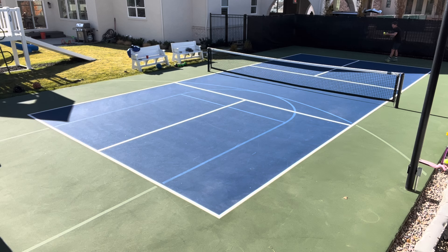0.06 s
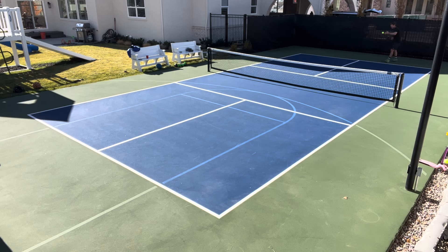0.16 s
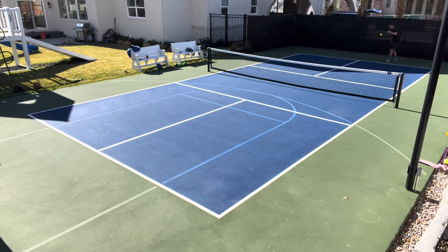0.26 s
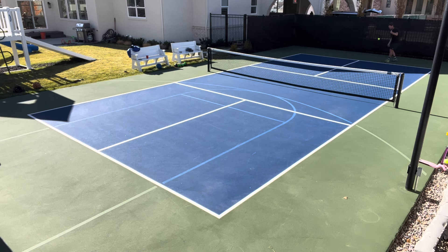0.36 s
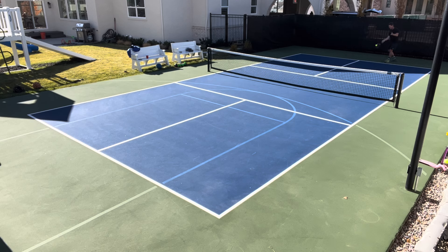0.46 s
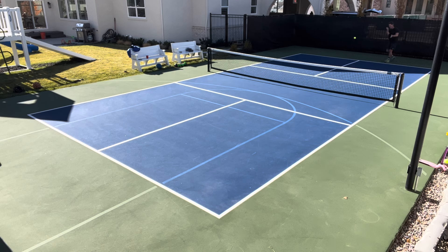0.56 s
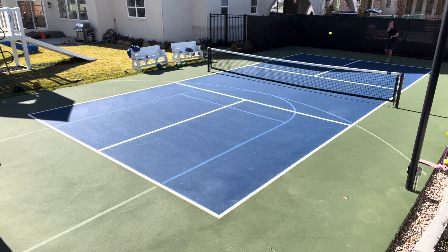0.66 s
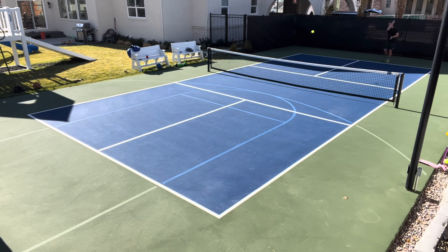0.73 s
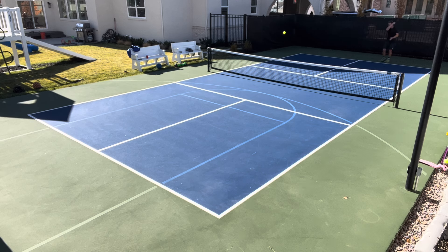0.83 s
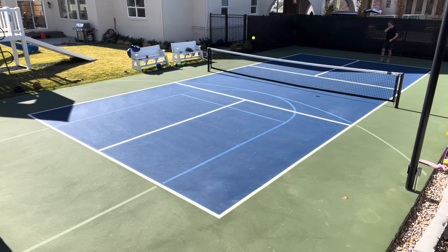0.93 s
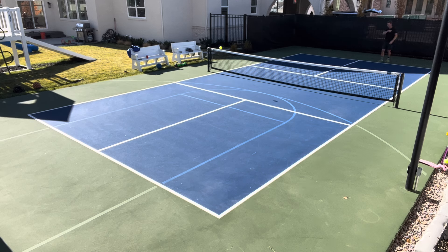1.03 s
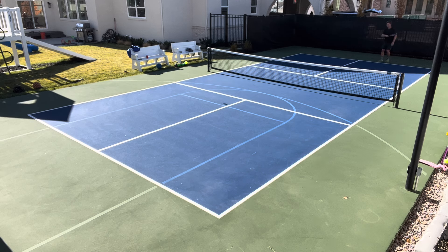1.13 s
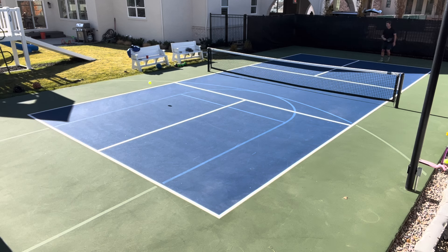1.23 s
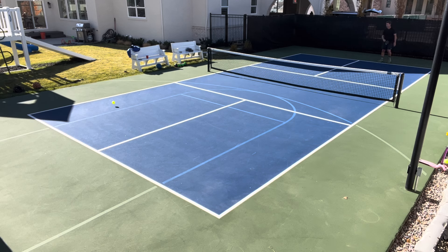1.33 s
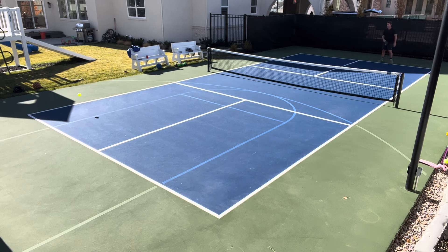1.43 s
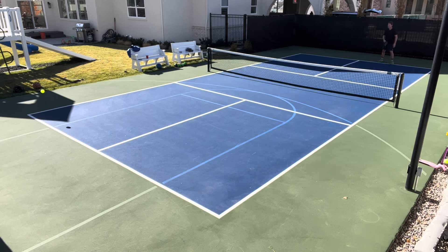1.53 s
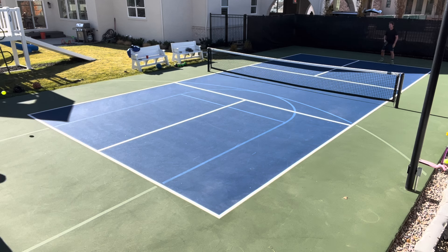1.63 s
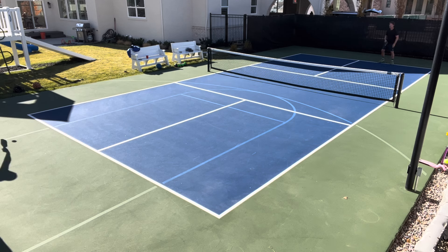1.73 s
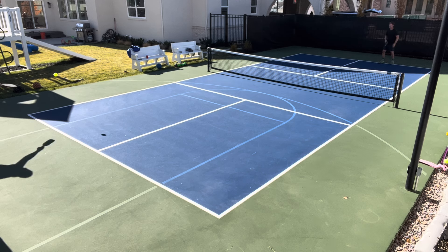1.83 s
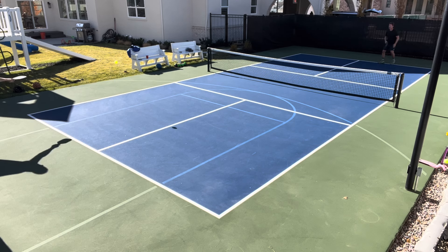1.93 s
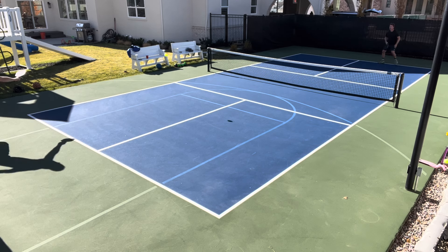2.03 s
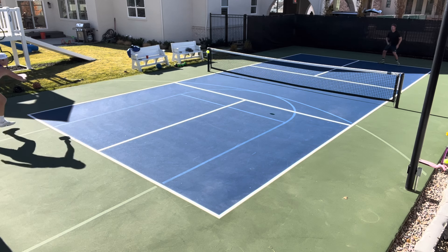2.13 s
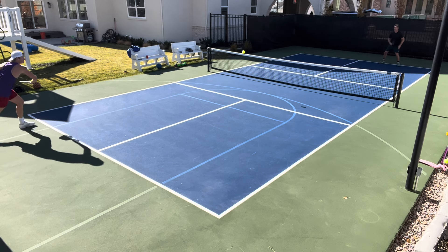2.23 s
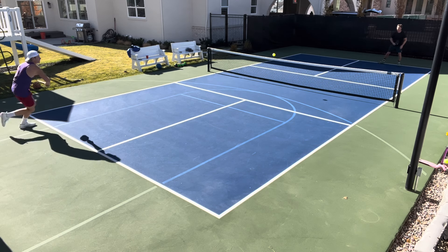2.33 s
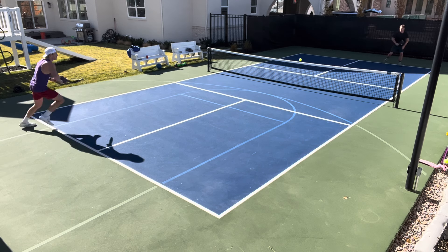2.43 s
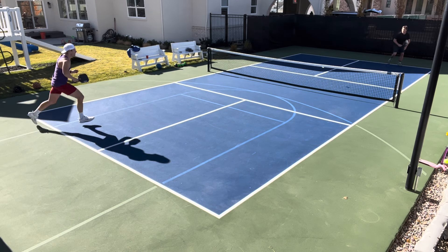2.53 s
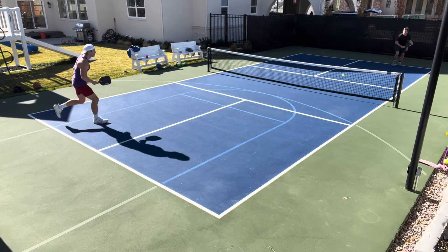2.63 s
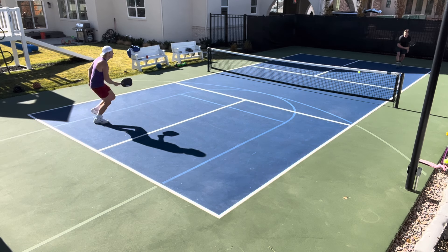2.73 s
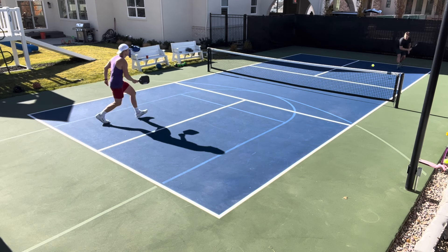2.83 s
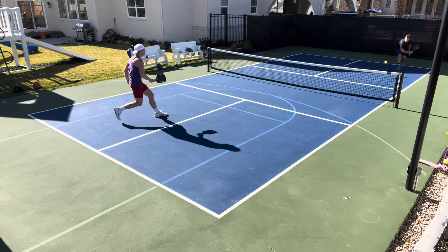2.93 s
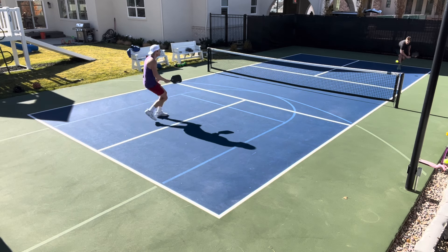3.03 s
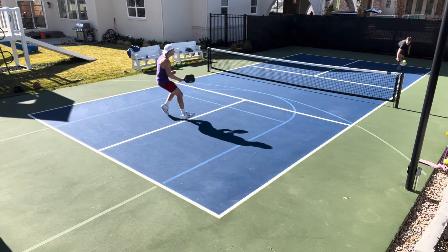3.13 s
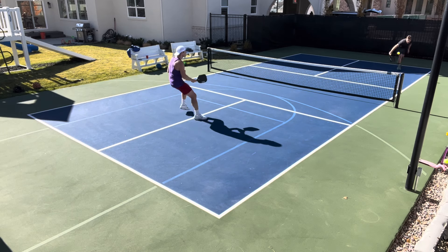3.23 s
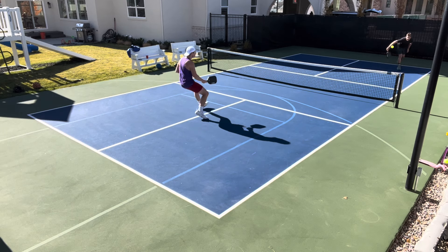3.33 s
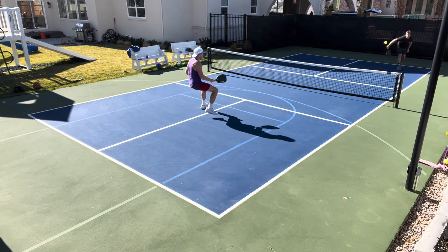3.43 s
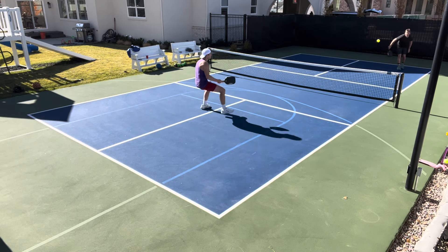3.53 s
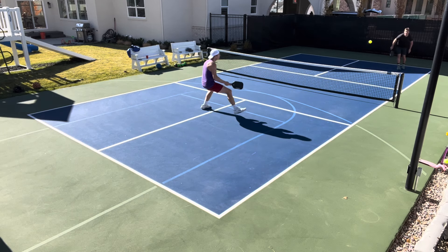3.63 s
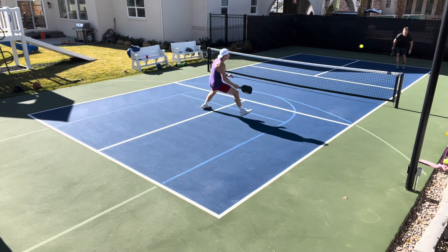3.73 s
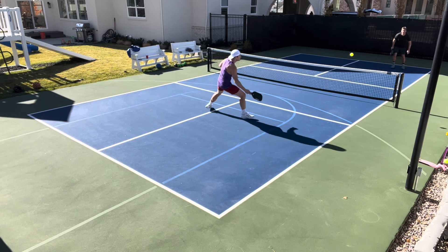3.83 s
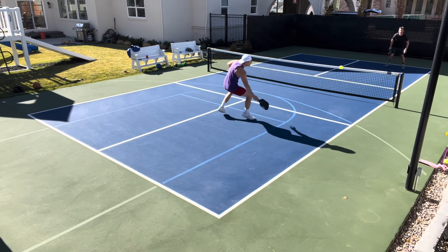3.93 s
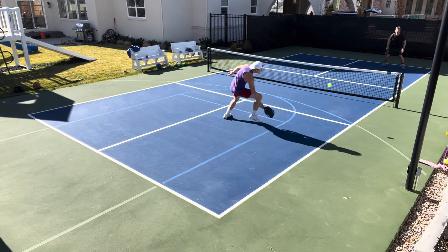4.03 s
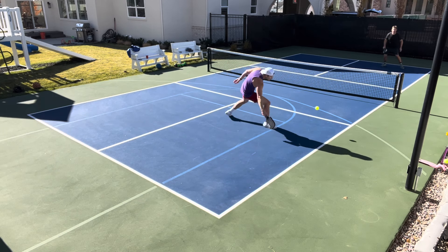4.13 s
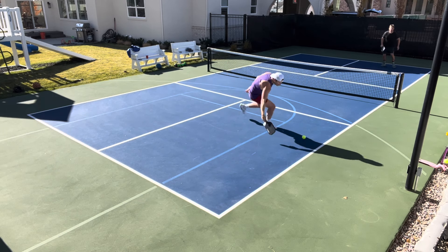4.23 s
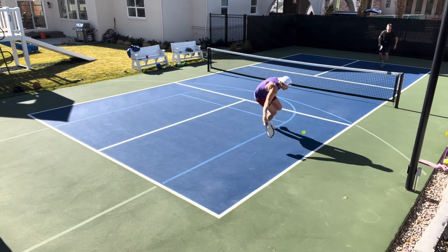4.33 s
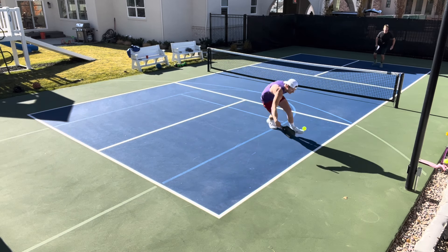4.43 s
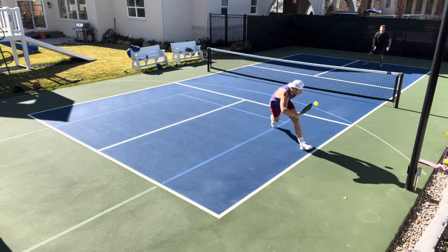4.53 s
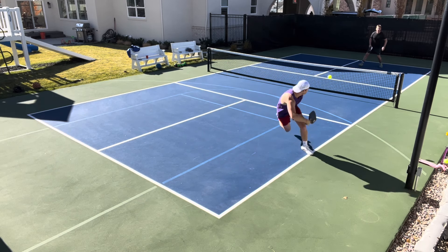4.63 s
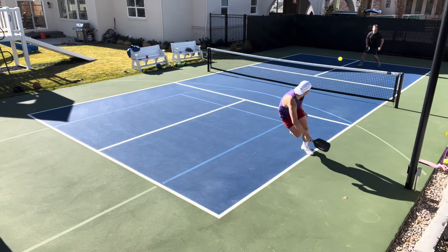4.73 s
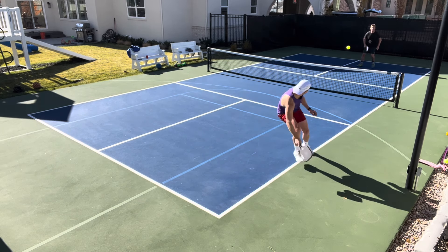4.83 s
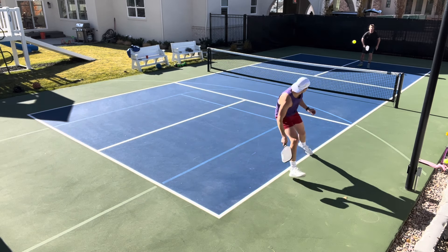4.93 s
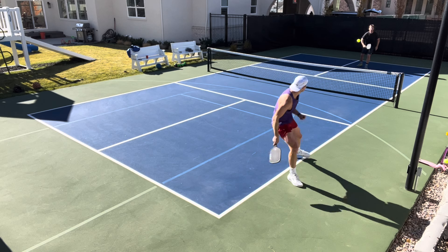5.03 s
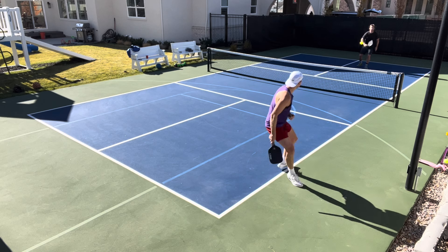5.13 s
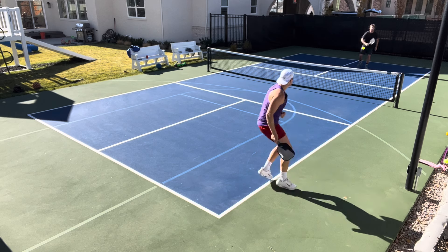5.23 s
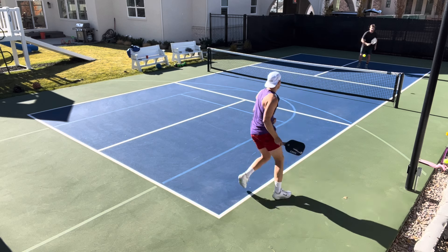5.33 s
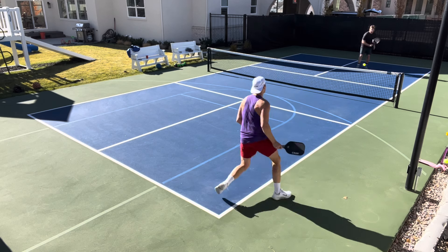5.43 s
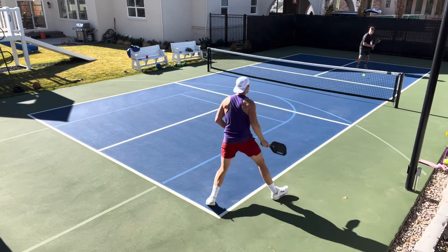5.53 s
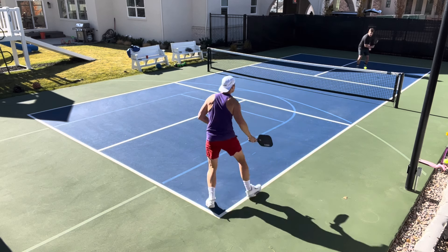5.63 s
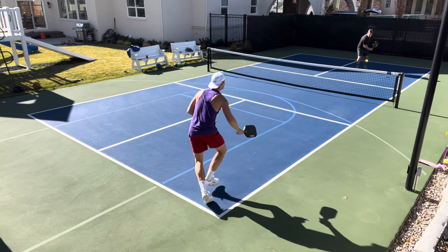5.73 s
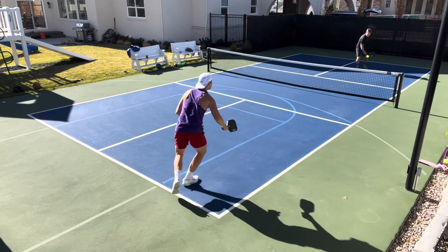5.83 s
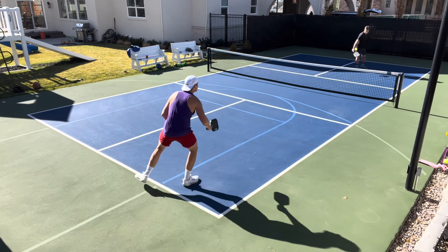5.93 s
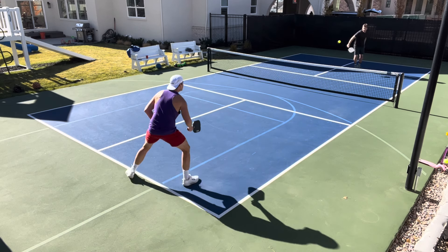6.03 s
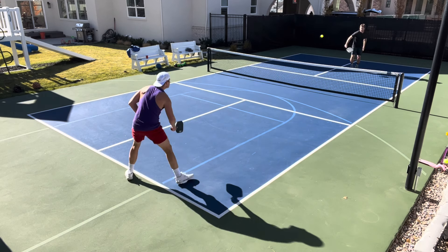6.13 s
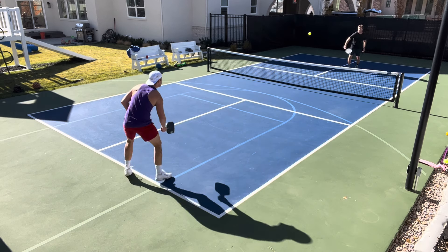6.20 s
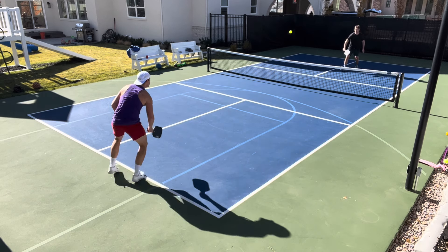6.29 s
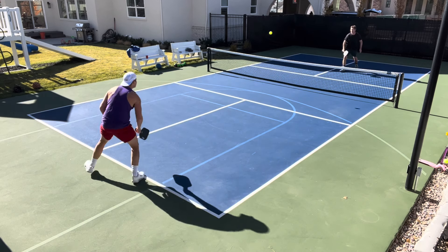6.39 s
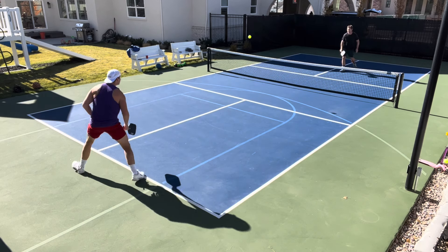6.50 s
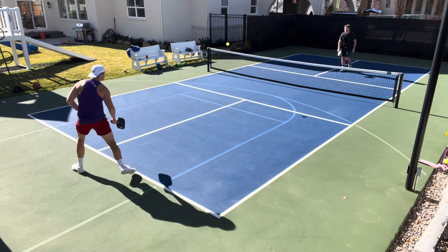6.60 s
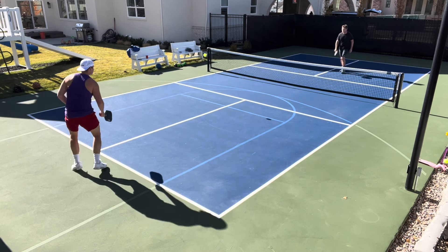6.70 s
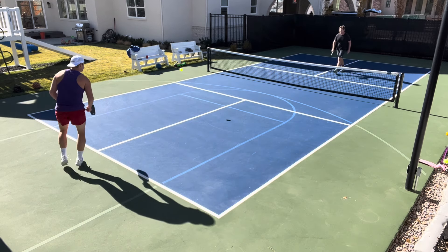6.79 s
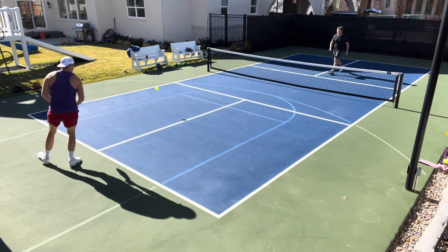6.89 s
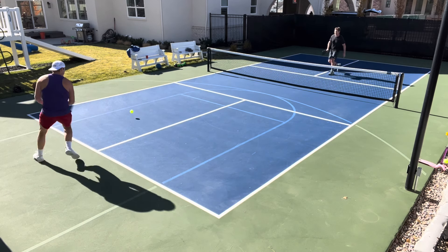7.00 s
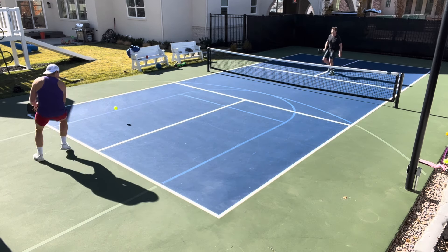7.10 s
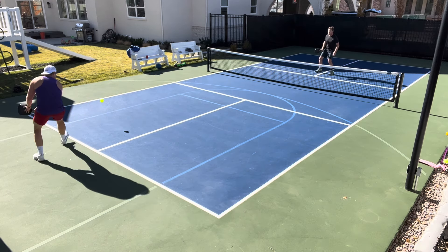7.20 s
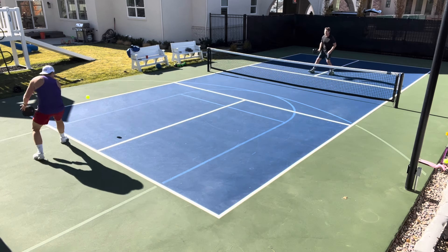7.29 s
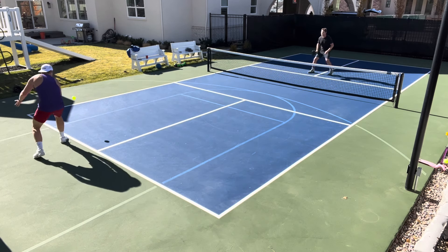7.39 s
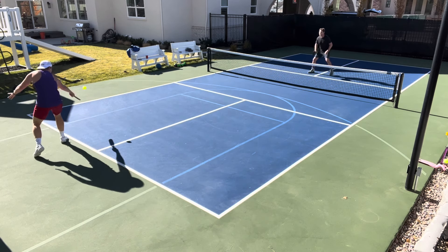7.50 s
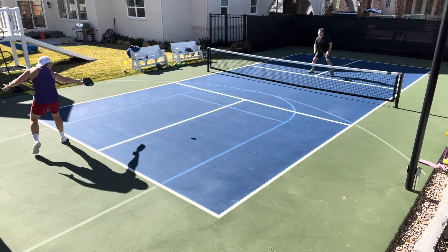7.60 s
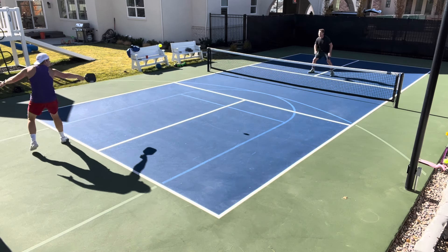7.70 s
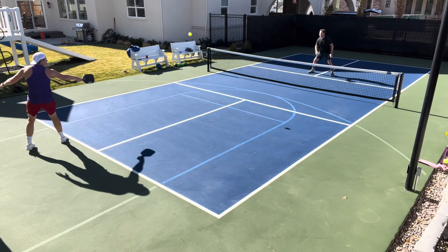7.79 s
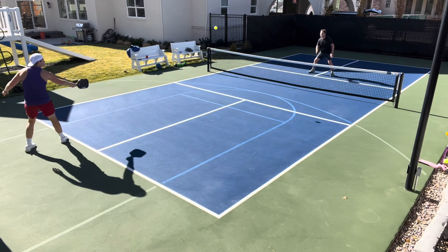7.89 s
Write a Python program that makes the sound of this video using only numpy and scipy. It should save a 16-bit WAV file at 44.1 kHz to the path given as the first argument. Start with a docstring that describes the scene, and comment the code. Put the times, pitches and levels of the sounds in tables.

```python
"""A pickleball rally on a hard backyard court. A faint low rumble runs throughout, as shaped noise.
Paddles pop as damped resonances and shell noise; house walls and a fence answer each shot.
Then the near player's soles scuff in short hisses, clothes rustle and shoes thud, and between
shots the hollow plastic ball ticks on the ground.
A small two-port microphone hears it all and passes the bass a few milliseconds late."""
import sys
import numpy as np
from scipy import signal
from scipy.fft import rfft, irfft, next_fast_len
from scipy.io import wavfile
from scipy.ndimage import uniform_filter1d, map_coordinates

SR = 44100
rng = np.random.default_rng(int(sys.argv[2]) if len(sys.argv) > 2 else 0)


def to_wav(s):
    """Save 16-bit WAV."""
    ch = np.atleast_2d(s).T  # columns
    pcm = np.round(np.clip(ch, -1, 1) * 32767)  # PCM
    wavfile.write(sys.argv[1], SR, pcm.astype(np.int16))


N = 350595
SIZE = 8192  # samples in a short sound
T = np.arange(SIZE) / SR
HZ = np.fft.rfftfreq(SIZE, 1 / SR)


def amp(db):
    """Decibels to gain."""
    return 10 ** (np.asarray(db) / 20)


def unit(x):
    """Scaled to rms 1."""
    return x / np.sqrt(np.mean(x ** 2) + 1e-20)


def along(points, hz):
    """(Hz, value) points joined on a log frequency axis."""
    f, v = np.transpose(points)
    return np.interp(np.log(hz + 1), np.log(f + 1), v)


def filtered(x, response):
    """x times a complex response of frequency."""
    size = x.shape[-1]
    padded = next_fast_len(size + SIZE, True)
    spectrum = rfft(x, padded) * response(np.fft.rfftfreq(padded, 1 / SR))
    return irfft(spectrum, padded)[..., :size]


def add(track, start_s, sound):
    """Mix a sound into the track at its start time."""
    start = max(round(start_s * SR), 0)
    part = track[:, start:start + sound.shape[-1]]
    part += sound[..., :part.shape[-1]]


def wave(spectrum):
    """The short sound with this spectrum, faded out at its end."""
    return irfft(spectrum) * np.clip(4 * (1 - T / T[-1]), 0, 1) ** 2


def causal(db):
    """The minimum-phase response with these gains."""
    cepstrum = irfft(np.log(amp(db)))
    cepstrum[1:SIZE // 2] *= 2
    cepstrum[SIZE // 2 + 1:] = 0
    return np.exp(rfft(cepstrum))


def mode(hz, width_hz):
    """One damped resonance with peak gain 1."""
    return 1j * HZ * width_hz / (hz * hz - HZ * HZ + 1j * HZ * width_hz)


def ringing(hz, width_hz, skirt=6.8):
    """A resonance struck softly, so that its skirts stay out of the treble and the deep bass."""
    return mode(hz, width_hz) * mode(hz, skirt * hz)


def struck(hz, width_hz):
    """A higher mode of paddle or ball, which swells over the millisecond of contact."""
    return ringing(hz, width_hz, skirt=0.21)


# Left-right likeness of diffuse sound. Each row: frequency in Hz, likeness 0-1.
PORT_LIKENESS = [(60, 1), (150, 0.82), (330, 0.68), (600, 0.054), (5000, 0.027), (7000, 0.53), (8600, 0.97)]


def diffuse(size):
    """White stereo noise, alike in both ports only where a diffuse field is."""
    likeness = along(PORT_LIKENESS, np.fft.rfftfreq(size, 1 / SR))
    turn = np.arccos(np.clip(likeness, -1, 1)) / 2
    noise = rfft(rng.standard_normal((2, size)))
    mid, side = irfft(noise * [np.cos(turn), np.sin(turn)], size)
    return np.array([mid + side, mid - side])


def shaped_noise(points):
    """Diffuse noise of rms 1 over the whole scene, with the given spectrum."""
    noise = diffuse(next_fast_len(N, True))[:, :N]
    return unit(filtered(noise, lambda hz: amp(along(points, hz))))


def burst(t60_s, attack=1):
    """Spectrum of a dying puff of noise of energy 1."""
    return rfft(unit(diffuse(SIZE) * amp(-60 * T / t60_s) * attack)) / np.sqrt(SIZE)


def contact(rough, t60_s, clean_hz=300):
    """A push that is clean in the bass and a short rough burst higher up."""
    bass = 1 / (1 + 1j * HZ / clean_hz)
    return bass + (1 - bass) * (np.sqrt(1 - rough) + np.sqrt(rough) * burst(t60_s))


# Decay of the yard tail. Each row: frequency in Hz, T60 in s.
YARD_T60_S = [(100, 1.46), (400, 0.83), (900, 1.59), (1450, 1.47), (2300, 0.83), (4000, 0.67), (6000, 0.54),
              (13000, 0.41)]
# Colour of the yard tail. Each row: frequency in Hz, relative level in dB.
YARD_COLOUR_DB = [(60, 2.5), (200, -1.5), (450, 3.5), (1000, 0), (1500, -2), (3000, 3), (7000, 1.5),
                  (14000, 1.5)]


def yard(x, build_s=0.0012, early_db=6, early_s=0.075, house_s=0.17, house_db=3, flicker_db=1.2):
    """Ground and fence scatter a sound into a lumpy tail; it swells again when the house answers."""
    hz, t, z = signal.stft(diffuse(SR), SR, nperseg=256)
    fade_db = along(YARD_COLOUR_DB, hz)[:, None] - 60 * t / along(YARD_T60_S, hz)[:, None]
    house_swell_db = house_db * np.exp(-((t - house_s) / 0.0093) ** 2)
    swell_db = early_db * np.exp(-t / early_s) + house_swell_db
    # random patches of the spectrum stand out or sink
    patches = uniform_filter1d(rng.standard_normal(z.shape[1:]), 8, 0)
    patches = uniform_filter1d(patches, 3, 1)
    lumps_db = 4.5 * np.tanh(unit(patches))
    # random short flickers make the tail uneven, like small slaps
    flickers_db = flicker_db * (np.minimum(rng.exponential(size=len(t)), 4) - 1)
    z = z * amp(fade_db + swell_db + lumps_db + flickers_db) * (1 - np.exp(-t / build_s))
    tail = unit(signal.istft(z, SR, nperseg=256)[1]) / np.sqrt(SR)
    return signal.fftconvolve(x.mean(0)[None], tail, axes=1)


# Rumble spectrum. Each row: frequency in Hz, relative density in dB per Hz.
RUMBLE_SPECTRUM = [(20, -40.5), (32, -24.5), (45, -13.5), (66, 0), (95, -9), (145, -18), (250, -25),
                   (420, -23.5), (950, -40.5), (3000, -55), (12000, -61)]
# Rumble level over time. Each row: time in s, level in dB before the rumble gain.
RUMBLE_LEVEL_DB = [(0.0, -54.5), (0.66, -49.5), (2.68, -54.5), (3.21, -51), (4.65, -51.5), (4.78, -55),
                   (6.71, -49.5), (7.35, -51), (7.95, -51)]


def rumble(gain_db=3):
    """A distant low rumble: shaped noise whose level drifts."""
    t = np.arange(N) / SR
    level_db = gain_db + np.interp(t, *np.transpose(RUMBLE_LEVEL_DB))
    return amp(level_db) * shaped_noise(RUMBLE_SPECTRUM)


# Paddle shots, far and near player in turn. Each row: start in seconds, face in Hz, face in dB,
# ball in Hz, ball in dB, (each higher paddle mode in dB), knock in dB, crack in dB, tick in dB,
# ring sent to yard and walls in dB, crack sent to yard in dB, echo knock in dB, extra echo delay in s.
PADDLE_SHOTS = [(0.5286, 313, 28, 1400, 36, (7, 19.5, 8.5, 27, 7.8), 10, 15.5, -1, -17, -7.5, -3.5, 0.0085),
                (1.7536, 334, 17, 1518, 18.5, (17.6, 11.4, 6.2, 1.7, 12), 15.5, 10.5, 8, 3, -4.5, 6, 0.002),
                (3.1690, 346, 29, 1387, 21, (30.5, 21.4, 8.1, 7.9, 9.3), 14, 12, -3.5, -5, -3, -2, 0.0035),
                (4.4937, 514, 27.5, 1478, 33.5, (34, 5.5, -2, 26.5, 3.5),
                -2.5, 12, 4, -26.5, -5, -21, 0.009), (5.9112, 320, 25.5, 1390, 32.5, (13, 14, -5.5, 3.5, 4),
                15, 8, 0, -18.5, -7, -12, .016), (7.494, 345, 13.5, 1460, 16.5, (6.5, 13.5, 0, 15.5, -9),
                15, 6, 2.5, -11, -6, -11, 0)]
# Drum modes of the face. Each row: multiple of its lowest, width in Hz, dB over the face level.
FACE_MODES = [(1, 102.4, 0.5), (1.35, 116.4, 0)]
# Higher paddle modes. Each row: frequency in Hz, width in Hz, dB added in the yard.
FAR_PADDLE_MODES = [(700, 110, -11), (1024, 31, -11), (1960, 71, -1.5), (2100, 58, -0.5), (3305, 44, -5.5)]
NEAR_PADDLE_MODES = [(754, 59, -13.5), (1065, 52, -10.5), (1700, 70, -0.5), (2020, 110, -2.5),
                     (2820, 220, -4)]
# Ball shell colour, for shots and bounces. Each row: frequency in Hz, relative level in dB.
SHELL_COLOUR = [(40, -24.5), (135, 1.5), (215, -8.5), (400, -5), (660, -0.5), (950, -2), (1600, 2),
                (2450, -1.5), (3200, -1.5), (4800, -4), (7000, 1.5), (13000, 1), (16000, 3)]


def shots(ball_width_hz=90, scattered_width_hz=260, spread_hz=150, ring_lag_s=0.00054, face_in_yard_db=14.5):
    """Each shot drums the paddle face, rings its higher modes and the hollow ball, and cracks the shell."""
    out = np.zeros((2, N))
    for k, shot in enumerate(PADDLE_SHOTS):
        s, face_hz, face_db, ball_hz, ball_db, modes_db, *shell_db, ring_wet_db, shell_wet_db, _, _ = shot
        knock_db, crack_db, tick_db = shell_db
        face = 0
        for j, (ratio, width_hz, db) in enumerate(FACE_MODES):
            # neighbouring drum modes have opposite sign
            face = face + (-1) ** j * amp(face_db + db) * ringing(face_hz * ratio, width_hz, skirt=2.5)
        # each player's paddle rings with its own modes
        modes = list(zip(NEAR_PADDLE_MODES if k % 2 else FAR_PADDLE_MODES, modes_db))
        paddle = sum(amp(db) * struck(hz, width_hz) for (hz, width_hz, _), db in modes)
        ball = amp(ball_db) * struck(ball_hz, ball_width_hz)
        strike_db = along([(600, knock_db), (2000, crack_db), (8000, tick_db)], HZ)
        shell = causal(along(SHELL_COLOUR, HZ) + strike_db)
        # the shell ticks first, then face and ball swing
        add(out, s, wave(shell * contact(rough=0.99, t60_s=0.04)))
        add(out, s + ring_lag_s, wave(face + paddle - ball))
        # in the yard every ring spreads over a wider band
        wide_ring = amp(ball_db) * ringing(ball_hz, scattered_width_hz, skirt=0.088)
        for (hz, width_hz, wet_db), db in modes:
            wide_ring = wide_ring + amp(db + wet_db) * struck(hz, width_hz + spread_hz)
        # the yard returns the face's drumming at one fixed level, however loud the shot
        spread = amp(face_in_yard_db - face_db) * face + amp(shell_wet_db) * shell
        add(out, s, yard(wave(spread + amp(ring_wet_db) * wide_ring)[None]))
    return out


# Walls that answer a shot, by the end it is played from. Each row: delay in s, drum in dB,
# knock gain in dB, ring gain in dB, rise in s, T60 in s, roughness 0-1.
FAR_SHOT_WALLS = [(0.115, 12.5, -17, -16, 0.014, 0.1, 1), (0.173, -3, -6, -15, 0.0011, 0.027, 0.35),
                  (0.245, -23.5, 2.5, -18, .002, 0.098, 0.37), (0.264, -5, -8, -13, 0.0031, 0.54, 0.89)]
NEAR_SHOT_WALLS = [(0.033, -7, -12.5, -3.5, .001, .03, 0.56), (0.08, 14.5, -11.5, -4, 0.031, 0.15, 1),
                   (0.313, 1.5, -5.5, -15, 0.00194, 0.12, .7)]


def echoes(drum_hz=440, drum_width_hz=200, knock_hz=600, knock_width_hz=520, ring_width_hz=220):
    """Walls return face drum, knock and ball ring, flat ones in a slap and rough ones smeared."""
    out = np.zeros((2, N))
    drum = ringing(drum_hz, drum_width_hz, skirt=0.87)
    for k, (s, _, _, ball_hz, ball_db, *_, ring_wet_db, _, echo_db, lag_s) in enumerate(PADDLE_SHOTS):
        knock = amp(echo_db) * ringing(knock_hz, knock_width_hz, skirt=4.7)
        ring = amp(ball_db + ring_wet_db) * ringing(ball_hz, ring_width_hz, skirt=0.51)
        walls = NEAR_SHOT_WALLS if k % 2 else FAR_SHOT_WALLS
        for delay_s, drum_db, knock_db, ring_db, rise_s, t60_s, rough in walls:
            smear = burst(t60_s, attack=(1 - np.exp(-T / rise_s)) ** 2)
            wall = np.sqrt(1 - rough) + np.sqrt(rough) * smear
            answer = amp(drum_db) * drum + amp(knock_db) * knock - amp(ring_db) * ring
            add(out, s + lag_s + delay_s, wave(answer * wall))
    return out


SAND_HZ = 2600  # middle pitch of a crushed grain


def sand(count, spread=0.59, cycles=9):
    """Sand grains crushed under a sole: tiny pings of uneven size and pitch, one per row."""
    t = T[:SIZE // 16]
    hz = SAND_HZ * np.exp(spread * rng.standard_normal((count, 1)))
    size = rng.random((count, 1)) ** 2
    return size * np.sin(2 * np.pi * hz * t) * np.exp(-hz * t / cycles)


# Soles sliding on the court. Each row: start in seconds, level in dB, length in s, centre in Hz.
SOLE_SCUFFS = [(0.964, -54, .09, 7000), (1.098, -60, .082, 6300), (1.197, -54.5, 0.11, 6970),
               (1.522, -56.5, .014, 7000), (2.231, -46.5, 0.013, 8050), (2.387, -56, 0.13, 3330),
               (2.851, -50, 0.025, 8730), (2.931, -50, 0.015, 6000), (3.363, -48.5, 0.062, 7100),
               (3.588, -45, 0.092, 4300), (3.854, -54, 0.012, 4230), (3.999, -49, 0.02, 4990),
               (4.131, -35.5, 0.013, 3910), (4.212, -49, 0.011, 10760), (4.339, -46.5, 0.0088, 12340),
               (5.012, -45.5, .06, 4130), (5.031, -39.5, 0.0098, 2730), (5.162, -56.5, 0.047, 3390),
               (5.293, -38.5, 0.058, 8520), (5.48, -51.5, .03, 8630), (6.185, -47, .016, 10100),
               (6.269, -51.5, 0.062, 8300), (6.35, -49.5, .054, 5170), (6.576, -43.5, 0.0094, 6230),
               (6.826, -52.5, 0.11, 3620), (6.96, -42.5, 0.046, 10800), (7.151, -48, 0.017, 10000),
               (7.256, -45, .011, 11160), (7.288, -52, 0.11, 9580), (7.845, -38.5, 0.031, 4200)]


def scuffs(stutter_db=3.0, octaves=1.3, sand_db=3, sand_loss_db_per_octave=5, wet_db=-9.0):
    """A sliding sole catches and slips over sandy paint in a short hiss, crushing single grains."""
    out = np.zeros((2, N))
    for s, db, length_s, centre_hz in SOLE_SCUFFS:
        stroke = np.sin(np.pi * np.clip(T / length_s, 0, 1) ** 0.68) ** 2
        stutter = stutter_db * unit(uniform_filter1d(rng.standard_normal(SIZE), size=220))
        band = lambda hz: 1 / (1 + (np.log2((hz + 1) / centre_hz) / octaves) ** 2)
        hiss = filtered(diffuse(SIZE), band)
        add(out, s, amp(db) * stroke * unit(hiss * amp(stutter)))
        # the higher the scuff, the less grit
        grit_db = db + sand_db - sand_loss_db_per_octave * np.log2(centre_hz / SAND_HZ)
        for ping in sand(count=12):
            add(out, s + length_s * rng.beta(2, 2), amp(grit_db) * ping)
    return out + amp(wet_db) * yard(out)[:, :N]


# Clothes and shoes. Each row: frequency in Hz, relative density in dB per Hz.
RUSTLE_SPECTRUM = [(100, -11.5), (400, 13.5), (1500, 9.5), (3000, 3), (7000, -5.5), (13000, -9),
                   (16000, -9)]


def rustle(level_db=-63, db_per_force_db=0.2, rise_s=0.077, fall_s=0.27, lag_s=0.027,
           flutter_db=3, flutter_per_s=18):
    """The player's clothes: fluttering noise that swells around each row of FOOTFALLS, more with force."""
    t = np.arange(N) / SR
    slow_t = np.linspace(0, t[-1], SIZE)
    swells = []
    for s, force_db, *_ in FOOTFALLS:
        age = slow_t - s - lag_s
        swell = np.exp(-(age / np.where(age < 0, rise_s, fall_s)) ** 2)
        swells.append(amp(db_per_force_db * force_db) * swell)
    motion = np.interp(t, slow_t, np.max(swells, axis=0))
    flutter = map_coordinates(rng.standard_normal(SIZE), [t * flutter_per_s])
    return amp(level_db + flutter_db * flutter) * motion * shaped_noise(RUSTLE_SPECTRUM)


# Footfalls, and a few soft knocks returned by the walls near 6.1-6.2 s.
# Each row: start in seconds, force in dB, weight in dB (high on the heel, low on the toe),
# knock in Hz, knock in dB, slap in dB, grit in dB.
FOOTFALLS = [(1.081, -12, 23, 300, -3, -4.5, -1.5), (1.2139, 1.5, 9.5, 360, -7.5, -1.5, 0),
             (2.2367, 3, 13.5, 350, -9, -1.5, -6), (2.632, -0.5, 14, 660, 11, -8, 10),
             (2.934, -2, 14, 608, 13, -19.5, -2.5), (2.9665, 15, 10, 630, -9, 14, -3),
             (3.241, 21.5, 9.5, 550, 2.5, 14, 5), (3.4, 13.5, 8.5, 710, 4.5, 0, -9.5),
             (3.8155, 7.5, 2.5, 610, 3.5, -7.5, 1), (3.8848, 8.5, -0.5, 553, 3.5, -3.5, -5),
             (3.998, 11.5, 1, 720, 1.5, 5, 2.5), (4.054, 3.5, 2.5, 487, 3, 2.5, 0.5),
             (4.129, 15, -16.5, 490, -25.5, -2, 12), (4.1429, 28, 3, 485, -4, 8.5, 1.5),
             (4.222, 3.5, 10, 330, 2, -1, -9), (4.247, 2.5, 17.5, 830, 11, 1, -7),
             (4.499, 17.5, 8, 300, -3, -19.5, -7.5), (4.551, 3.5, 17, 360, 1, -4, -7.5),
             (4.5773, 21.5, 9.5, 490, -16, 8.5, 3), (4.9785, 9.5, -1, 398, 10.5, -1, 0),
             (4.9975, 17.5, 7.5, 625, -9.5, 9.5, 0.5), (5.295, 7, -3, 866, 1.5, -6.5, -20),
             (5.37, -2.5, 20, 526, -10.5, 2, 6.5), (5.5016, 12.5, 5, 810, 5, -4, 0.5),
             (5.8175, 15, -34, 580, 3, -10, -10.5), (5.842, -7.5, 21, 550, 11.5, -1.5, -10.5),
             (6.061, 1, 21, 570, 5.5, 9.5, -8), (6.098, -4.5, 8, 600, 12.5, -1, -7),
             (6.19, -7, 2, 980, 21.5, -3, -10), (6.272, -4.5, -7, 580, 12.5, -2, 4.5),
             (6.292, -5.5, 10, 620, 11, 6, -22), (6.5, -14.5, 15, 560, 8, 2.5, 6.5),
             (6.558, -7.5, 13.5, 570, 22, -13.5, -3.5), (6.864, -4, 23, 362, 5, -1.5, -3),
             (7.0089, 10.5, 13.5, 720, 1, -2, 1), (7.317, 3, 6, 700, 13, 5.5, -4),
             (7.847, 2, 3, 419, -5, -7, 8.5)]
# Knock and grit grow faster than the force, slap slower; rows are knock, slap and grit.
# Each row: frequency in Hz, dB at force 0, dB per dB of force.
LANDING_BANDS = [(450, -3, 1.2314), (1580, -15.5, 0.74), (6430, -32, 1.352)]
# Sole colour. Each row: frequency in Hz, relative level in dB.
SOLE_COLOUR = [(30, -36), (70, -9.5), (135, -1), (215, -9), (320, -1.5), (500, -1), (850, -1), (1100, -7),
               (1500, -2.5), (1880, -1.5), (2250, -1), (2900, -1.5), (4200, -0.5), (6500, -6), (9000, -8),
               (15000, -15.5)]
# Sole resonances. Each row: frequency in Hz before the random shift, width in Hz, level in dB.
SOLE_RESONANCES = [(1134, 30, -4), (1564, 140, -3.5), (2230, 200, -0.5), (2864, 200, -6.5)]
# Share of a footfall that reaches the yard. Each row: frequency in Hz, gain in dB.
STEP_WET_DB = [(130, -10), (300, -8), (600, -17), (1400, -14.5), (2600, -11.5), (6000, -15.5)]


def steps(roll_s=0.0025, roll=0.65, knock_width_hz=125):
    """A rubber sole lands with a thud, a hollow knock, a slap and a little grit, then rolls flat."""
    out = np.zeros((2, N))
    for s, force_db, weight_db, knock_hz, knock_db, slap_db, grit_db in FOOTFALLS:
        chance, *shifts = rng.standard_normal(1 + len(SOLE_RESONANCES))
        bands = [(130, force_db + weight_db)]
        for (hz, db, db_per_db), own_db in zip(LANDING_BANDS, (0, slap_db, grit_db)):
            bands.append((hz, db + db_per_db * force_db + own_db))
        landing = causal(along(bands, HZ) + along(SOLE_COLOUR, HZ))
        knock = 1 + amp(knock_db) * mode(knock_hz, knock_width_hz)
        # sole resonances, each shifted a little at random for every step
        sole = 1
        for (hz, width_hz, db), shift in zip(SOLE_RESONANCES, shifts):
            sole = sole + amp(db) * mode(hz * np.exp(0.1 * shift), width_hz)
        # the second touch combs the spectrum, differently for every step
        touch_s = roll_s * np.exp(0.35 * chance)
        flat = roll * mode(850, 3500) * np.exp(-2j * np.pi * HZ * touch_s)
        add(out, s, wave(knock * sole * landing * (contact(rough=0.62, t60_s=0.044) + flat)))
    scattered = filtered(out, lambda hz: amp(along(STEP_WET_DB, hz)))
    return out + yard(scattered)[:, :N]


# Ball on the court. Each row: start in seconds, knock in dB, crack in dB, tick in dB.
BALL_BOUNCES = [(1.3578, 2, -6.5, -3), (2.7162, 5, -15, -10), (4.274, 6.5, -2.5, -3),
                (5.5963, 5, -13, -6.5), (7.0565, 7.5, -11, -5)]
# Modes of the bouncing ball. Each row: frequency in Hz, width in Hz, level in dB.
BOUNCE_MODES = [(1480, 150, -7), (2750, 240, 6), (4060, 370, -6.5)]


def bounces(wet_db=-7):
    """The stiff plastic shell clicks on the hard court; its ring lingers in the yard."""
    out = np.zeros((2, N))
    # the shell's modes stand out in the tail
    ring = 1 + sum(amp(db) * mode(hz, width_hz) for hz, width_hz, db in BOUNCE_MODES)
    for s, knock_db, crack_db, tick_db in BALL_BOUNCES:
        strike_db = along([(500, knock_db), (1800, crack_db), (8000, tick_db)], HZ)
        shell = causal(along(SHELL_COLOUR, HZ) + strike_db)
        add(out, s, wave(shell * contact(rough=1.0, t60_s=0.028)))
        add(out, s, amp(wet_db) * yard(wave(shell * ring)[None]))
    return out


def scene():
    """Ball, shoes and yard together."""
    return rumble() + shots() + echoes() + scuffs() + rustle() + steps() + bounces()


# Phase between the ports. Each row: frequency in Hz, radians by which left leads.
PORT_PHASE_RAD = [(0, 0), (150, .4), (350, 1), (600, 1.6), (850, 1.5), (1300, -.9), (2200, -1.4),
                  (6000, -1), (7500, -1.5), (8500, -3), (9600, -3.25), (12000, -6.28), (15000, -9.4)]
# Level between the ports. Each row: frequency in Hz, left minus right in dB.
LEFT_MINUS_RIGHT_DB = [(60, 0), (300, 2), (3000, 1.1), (7000, 0.5)]
# Bass delay before its fade towards the treble. Each row: frequency in Hz, delay in s.
BASS_DELAY_S = [(60, .014), (140, 0.0085), (220, 0.0046), (400, 0.0021), (700, 0.0016)]
# Microphone colour. Each row: frequency in Hz, gain in dB.
MIC_COLOUR_DB = [(6000, -0.5), (7500, -2), (9000, -1.5), (11000, -1.5), (14500, -11), (16000, -10)]


def record(dry, top_hz=16200, delay_fade_hz=920):
    """The ports differ in phase and level, the bass comes late, and nothing passes the band limit."""
    def microphone(hz):
        half_lead = 0.5 * np.interp(hz, *np.transpose(PORT_PHASE_RAD))
        left = np.exp(1j * half_lead) * amp(along(LEFT_MINUS_RIGHT_DB, hz) / 2)
        delay_s = along(BASS_DELAY_S, hz) * np.exp(-(hz / delay_fade_hz) ** 2)
        late_rad = 2 * np.pi * np.cumsum(delay_s) * hz[1]  # phase is the integral of delay
        colour = amp(along(MIC_COLOUR_DB, hz)) * (hz < top_hz)
        return np.array([left, 1 / left]) * np.exp(-1j * late_rad) * colour
    return filtered(dry, microphone)


dry = scene()
out = record(dry)
to_wav(out)
```